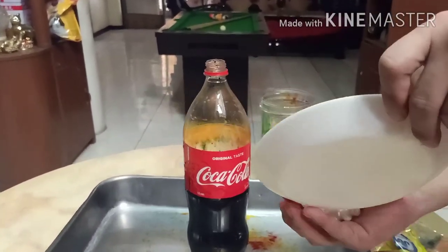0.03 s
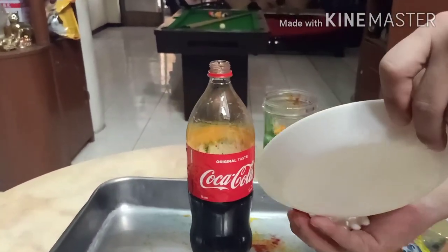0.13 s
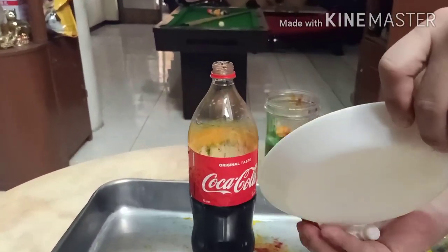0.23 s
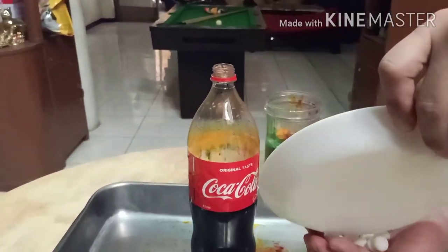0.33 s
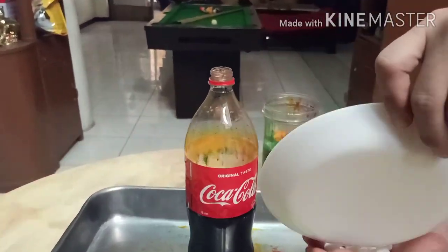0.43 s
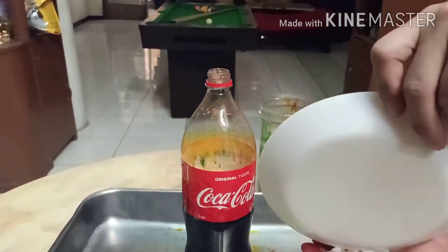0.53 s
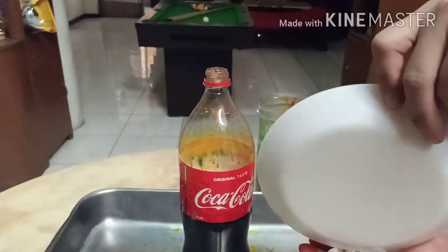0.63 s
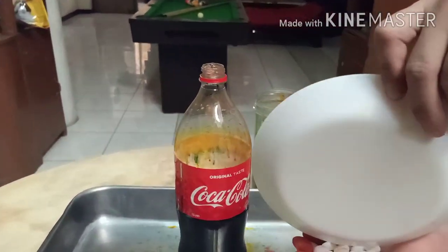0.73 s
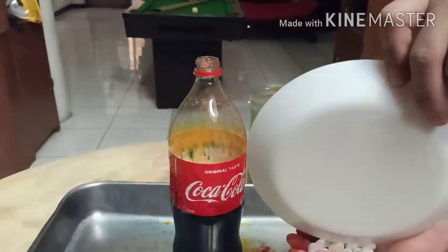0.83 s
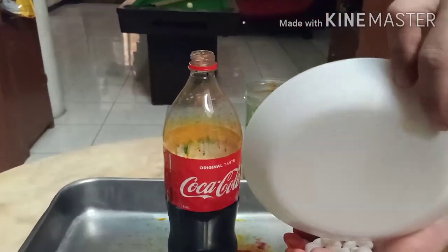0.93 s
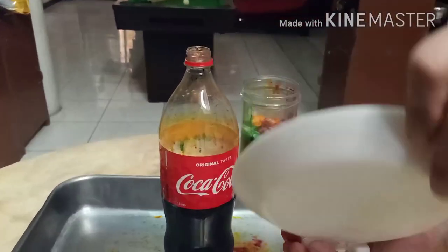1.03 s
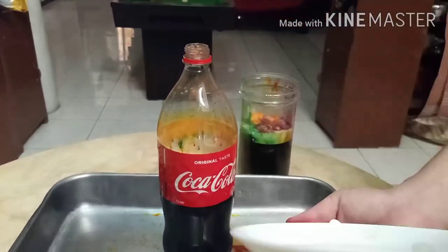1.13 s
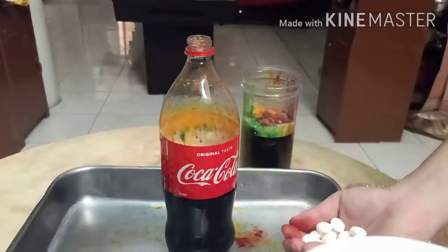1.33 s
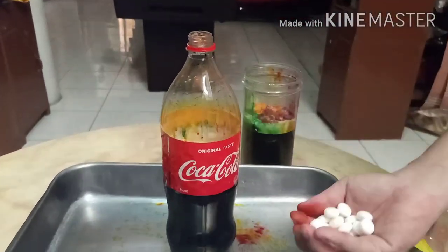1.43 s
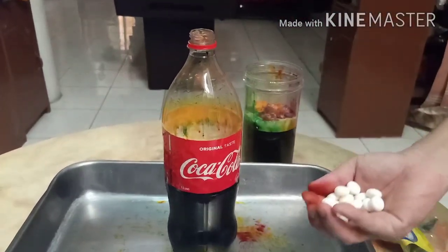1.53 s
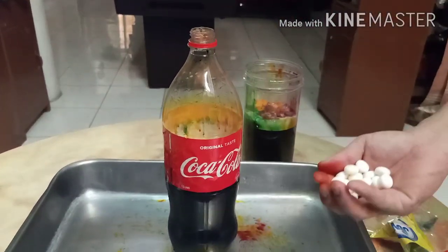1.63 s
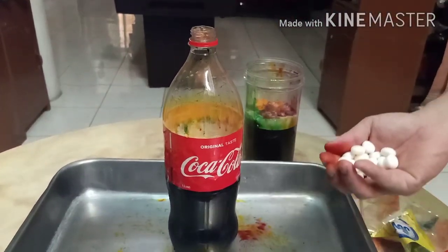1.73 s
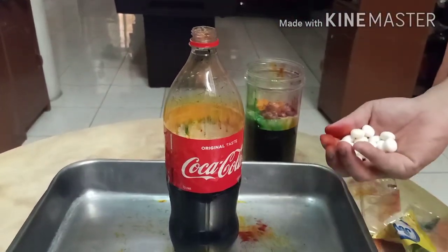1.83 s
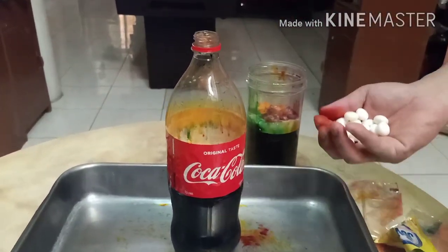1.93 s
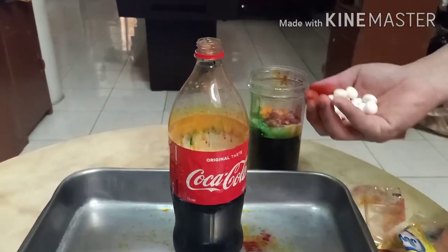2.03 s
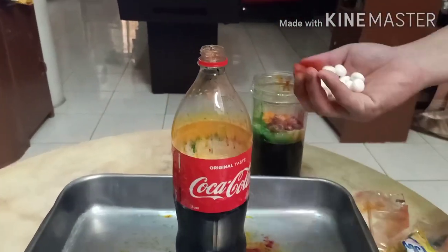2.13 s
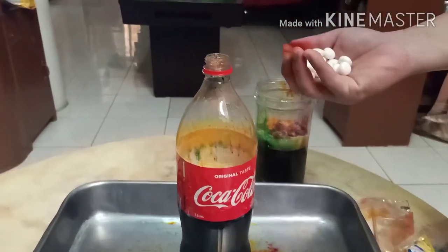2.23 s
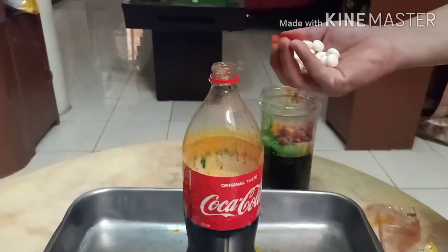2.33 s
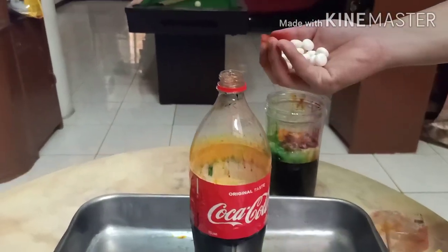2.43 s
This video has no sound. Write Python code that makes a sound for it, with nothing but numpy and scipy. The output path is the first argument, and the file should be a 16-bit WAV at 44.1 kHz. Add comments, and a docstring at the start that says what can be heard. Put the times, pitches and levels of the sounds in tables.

```python
"""Hard sweets slide off a tilted ceramic plate into a hand, clinking on the plate, which the fingers damp.
The plate is then put down on a hard table: one sharp knock, and a short clatter as it settles flat.
Each clink and knock is a set of dying sine tones plus a short noise burst; sliding is many tiny ticks.
A tiled room answers every blow with a noise tail. Hiss, a low rumble, a hum and a whine lie behind."""
import sys
import numpy as np
from scipy import signal
from scipy.fft import rfft, irfft
from scipy.io import wavfile
from scipy.ndimage import uniform_filter1d

SR = 44100
rng = np.random.default_rng(int(sys.argv[2]) if len(sys.argv) > 2 else 0)


def waveform_to_disk(signal):
    """Save audio, clipped to [-1, 1], as 16-bit WAV at the path in sys.argv[1]."""
    frames = np.transpose(np.atleast_2d(signal))
    scaled = np.clip(frames, -1, 1) * 32767
    samples = np.round(scaled).astype(np.int16)
    wavfile.write(sys.argv[1], SR, samples)


N = 108045
TIME = np.arange(N) / SR  # the whole scene [s]
RING = TIME[:SR // 2]  # the half second given to each blow [s]


def amp(db):
    """Turns decibels into a gain."""
    return 10 ** (np.asarray(db) / 20)


def unit(x):
    """Scales a signal to an rms of 1."""
    return x / np.sqrt(np.mean(x ** 2) + 1e-20)


def read(points, hz):
    """Reads a (frequency, value) table between its points, on a log-frequency axis."""
    f, value = np.transpose(points)
    return np.interp(np.log(hz + 1), np.log(f + 1), value)


def level(points):
    """Turns a (time [s], level [dB]) table into a gain over the whole scene."""
    return amp(np.interp(TIME, *np.transpose(points)))


def pan(db):
    """Gives left and right gains that differ by this many dB."""
    return amp(np.array([[db / 2], [-db / 2]]))


def add(mix, s, sound):
    """Mixes a stereo sound in at a time in seconds."""
    part = mix[:, max(round(s * SR), 0):][:, :sound.shape[1]]
    part += sound[:, :part.shape[1]]


def fall(t, t60):
    """Dies away by 60 dB in t60 seconds."""
    return np.exp(-np.log(1000) * t / t60)


def delayed(lead_ms):
    """Gives left and right clocks for a sound that reaches the left microphone first."""
    return np.maximum(RING - np.array([[0], [lead_ms / 1000]]), 0)


# how alike left and right are: (frequency [Hz], likeness [0 to 1])
LIKENESS = [(50, 0.96), (300, 0.93), (600, 0.55), (1200, 0.01)]


def coloured(x, colour):
    """Gives two noises a spectrum and makes their bass alike, as two close microphones hear it."""
    length = x.shape[1]
    hz = np.fft.rfftfreq(length, 1 / SR)
    left, other = rfft(x)
    same = np.clip(read(LIKENESS, hz), -1, 1)
    right = same * left + np.sqrt(1 - same ** 2) * other
    return unit(irfft(np.array([left, right]) * amp(read(colour, hz)), length))


def burst(colour, t60):
    """Stands in for countless dying modes with a fading noise, of energy 1 per channel."""
    rise_ms = 0.45
    shape = (1 - np.exp(-(1000 * RING / rise_ms) ** 2)) * fall(RING, t60)
    x = coloured(rng.standard_normal((2, len(RING))), colour) * shape
    return x / np.linalg.norm(x, axis=1, keepdims=True)


def mode(hz, db, t60, lead_ms):
    """Rings one struck mode: a sine that swells over its first cycle, then dies away."""
    t = delayed(lead_ms)
    swell = 1 - np.exp(-(2 * hz * t) ** 2)
    return -amp(db) * swell * fall(t, t60) * np.sin(2 * np.pi * hz * t)


# colour of the room hiss: (frequency [Hz], relative level [dB per Hz])
HISS = [(100, -2), (500, -3.5), (900, 0), (1300, -6.5), (2300, 7), (3400, -4), (4700, -9), (7000, -10.5),
        (8200, -41.5), (10000, -31.5), (16000, -38)]
HISS_DB = -58.5


def hiss():
    """Even room hiss: steady noise with a fixed colour."""
    return amp(HISS_DB) * coloured(rng.standard_normal((2, N)), HISS)


# colour of the low rumble: (frequency [Hz], relative level [dB per Hz])
RUMBLE = [(25, 5), (60, -15), (125, 4.5), (230, -6), (320, -1), (480, -16.5), (800, -21), (3000, -63.5)]
# loudness of the rumble: (time [s], level [dB])
RUMBLE_LEVEL = [(0, -45.5), (.18, -44), (.28, -47), (.38, -51.5), (.6, -46), (.95, -50.5), (1.25, -49.5),
                (1.43, -50), (1.55, -54.5), (1.8, -50), (2.45, -55)]
RUMBLE_PATCH_DB = 3  # how far patches of time and pitch stray in level, rms


def rumble():
    """A low rumble: noise that wavers in random patches of time and pitch."""
    z = signal.stft(coloured(rng.standard_normal((2, N)), RUMBLE), nperseg=1024)[2]
    patches = rng.standard_normal(z.shape[1:])
    patches = uniform_filter1d(patches, size=6, axis=0)
    patches = unit(uniform_filter1d(patches, size=3, axis=1))
    wavering = signal.istft(z * amp(RUMBLE_PATCH_DB * patches), nperseg=1024)[1][:, :N]
    return level(RUMBLE_LEVEL) * unit(wavering)


# a low hum that swells and fades: (time [s], level [dB])
HUM = [(.5, -59), (.7, -52), (.85, -47), (.97, -52.5), (1.05, -67), (2.45, -57)]
HUM_HZ, HUM_OCTAVE_DB = 75.5, -2


def hum():
    """A low tone and its octave, their pitch drifting a little."""
    drift = unit(uniform_filter1d(rng.standard_normal(N), size=4000))
    turn = 2 * np.pi * np.cumsum(HUM_HZ * (1 + 0.022 * drift)) / SR
    return level(HUM) * (np.sin(turn) + amp(HUM_OCTAVE_DB) * np.sin(2 * turn))


# a faint high whine: (time [s], level [dB])
WHINE = [(1.1, -64), (1.3, -71.5), (1.75, -67.5), (1.9, -85.5)]
WHINE_HZ, WHINE_WIDTH_HZ = 4290, 78


def whine():
    """A faint whine: noise squeezed into a narrow band."""
    band = np.exp(-((np.fft.rfftfreq(N, 1 / SR) - WHINE_HZ) / WHINE_WIDTH_HZ) ** 2)
    return level(WHINE) * unit(irfft(rfft(rng.standard_normal((2, N))) * band, N))


# how long the room rings: (frequency [Hz], time to die by 60 dB [s])
ROOM_T60 = [(100, 0.92), (400, 0.79), (1000, 0.76), (2200, 0.95), (4500, 0.69), (7000, 0.68), (14000, 0.34)]
# colour of the room: (frequency [Hz], relative level [dB])
ROOM_COLOUR = [(100, 3), (500, -2.5), (1500, 2), (3000, 3.5), (6500, -1), (9000, -3.5), (15000, -1)]
EARLY_DB, EARLY_T60 = 3.5, 0.13  # dense early reflections: level against the tail, time to die [s]


def room(x):
    """Dense early reflections, and a tail in which each band dies at its own speed."""
    noise = coloured(rng.standard_normal((2, SR)), ROOM_COLOUR)
    hz, t, z = signal.stft(noise, SR, nperseg=256)
    decay = fall(t, read(ROOM_T60, hz)[:, None]) + amp(EARLY_DB) * fall(t, EARLY_T60)
    opening = np.clip(TIME[:SR] / 0.0066 - 1, 0, 1)  # silent for 6.6 ms, full after 13.2 ms
    tail = signal.istft(z * decay, SR, nperseg=256)[1][:, :SR] * opening
    source = unit(x.mean(0))[None] * np.sqrt(np.mean(x ** 2))  # mono, but as strong as the stereo
    return signal.fftconvolve(source, tail / np.linalg.norm(tail[0]), axes=1)[:, :N]


# soft scuffs of sweets on the palm: (time [s], level [dB])
SCUFFS = [(.159, -43.5), (0.502, -49.5)]
SCUFF_HZ, SCUFF_FALL_PER_S, SCUFF_MS = 1430, 24.4, 2.6  # starting pitch, its fall, time to the peak
SWEETS_PAN_DB = 2.5  # scuffs, sliding and ticks lean left


def scuffs():
    """Sweets rub against the palm with a short blip that falls in pitch."""
    out = np.zeros((2, N))
    u = RING * 1000 / SCUFF_MS
    turn = 2 * np.pi * np.cumsum(SCUFF_HZ * np.exp(-SCUFF_FALL_PER_S * RING)) / SR
    blip = u * np.exp(1 - u) * np.sin(turn)
    for s, db in SCUFFS:
        add(out, s, pan(SWEETS_PAN_DB) * amp(db) * blip)
    return out


# sweets sliding over the glaze: (time [s], level [dB])
SLIDE = [(0, -37), (.05, -46), (.075, -46.5), (.14, -44.5), (.18, -54), (.3, -47.5), (.5, -56), (.7, -71.5)]
SLIDE_GRAINS_PER_S = 1300
# colour of a tick on the glaze, for sliding and clinks: (frequency [Hz], relative level [dB])
TICK = [(500, -30), (1100, -6), (2500, -2.5), (4500, -10), (6500, 3.5), (7800, -10.5), (9000, -24.5),
        (15000, -32)]
TICK_DB, TICK_T60 = 2.5, 0.03  # the level is added to each clink's own; time to die [s]


def slide():
    """Tiny uneven ticks at random moments as the sweets slip down the plate."""
    strength = amp(3.2 * np.minimum(rng.exponential(1, N), 4))
    grains = (rng.random(N) < SLIDE_GRAINS_PER_S / SR) * strength
    scrape = unit(signal.fftconvolve(grains[None], burst(TICK, TICK_T60), axes=1)[:, :N])
    return pan(SWEETS_PAN_DB) * level(SLIDE) * scrape


SLAP_HZ, SLAP_DB, SLAP_MS, SLAP_LEAD_MS = 1077, -5.5, 0.4, 0.19  # the level is added to each knock's own


def slap():
    """Air slapped out from under the plate: a brief burst of pressure as the gap closes."""
    t = delayed(SLAP_LEAD_MS)
    u = t * 1000 / SLAP_MS
    return -amp(SLAP_DB) * u * np.exp(1 - u) * np.sin(2 * np.pi * SLAP_HZ * t)


# plate against table: (time [s], thump level [dB], slap level [dB], ring level [dB], crack level [dB],
# left over right [dB], for all but the thump)
KNOCKS = [(1.8108, -2.5, 0.5, 2, -3, 5), (1.836, -13, -20.5, -7.5, -19.5, 6),
          (2.0646, -22, -28.5, -29.5, -53, 1.5), (2.0964, -1, -12.5, -6.5, -3.5, 2),
          (2.1037, -14, -14.5, -13.5, -24, 7), (2.1121, -8, -15, -15, -1, 4), (2.1175, 4, -25, -21, -7, -7)]
# modes of the tabletop: (frequency [Hz], level before the thump level is added [dB], time to die by 60 dB [s])
TABLE = [(77.1, -43.5, 0.46), (130.2, -49, 0.47), (200.6, -36.5, 0.2), (294, -38.5, 0.25),
         (425, -30, 0.043), (500, -30.5, 0.063), (685, -33, 0.042)]
# modes of the plate pressed on the table: (frequency [Hz], level before the ring level is added [dB],
# time to die by 60 dB [s])
PRESSED = [(946, -26.5, 0.035), (1412, -28, 0.04), (1581, -31, 0.077), (2240, -31.5, 0.062),
           (2900, -34, 0.04), (4550, -27, 0.018), (6800, -37.5, 0.046)]
# colour of each blow's dense clatter: (frequency [Hz], relative level [dB])
CLATTER = [(60, -14), (200, 0), (600, -6), (1000, -8), (1700, -2.5), (3000, -9.5), (4000, -20.5),
           (6500, -25.5), (9000, -40)]
# colour of each blow's crack: (frequency [Hz], relative level [dB])
CRACK = [(300, 5.5), (1000, 6.5), (2300, 1.5), (3600, -8), (4800, -7), (7200, -10.5), (8500, -23),
         (15000, -41)]
# levels are added to the ring and crack levels; times to die [s]
CLATTER_DB, CLATTER_T60, CRACK_DB, CRACK_T60 = 3.5, 0.052, 1, 0.01
KNOCK_LEAD_MS, KNOCK_ROOM_DB = 0.11, -9  # how much sooner the thump is heard left; level in the room
KNOCK_EDGE_HZ = 7270  # knocks lose their treble above this


def knocks():
    """The plate's foot hits the table: the top thumps, the plate slaps and rings, the contact cracks."""
    out = np.zeros((2, N))
    treble_cut = signal.butter(6, KNOCK_EDGE_HZ, fs=SR, output="sos")
    for s, thump_db, slap_db, ring_db, crack_db, side_db in KNOCKS:
        thump = sum(mode(hz, db + thump_db, t60, KNOCK_LEAD_MS) for hz, db, t60 in TABLE)
        # neighbouring modes start in opposite directions
        ring = sum((-1) ** k * mode(hz, db, t60, SLAP_LEAD_MS)
                   for k, (hz, db, t60) in enumerate(PRESSED))
        clatter = amp(CLATTER_DB) * burst(CLATTER, CLATTER_T60)
        crack = amp(CRACK_DB + crack_db) * burst(CRACK, CRACK_T60)
        plate = amp(slap_db) * slap() + amp(ring_db) * (ring + clatter) + crack
        add(out, s, signal.sosfilt(treble_cut, thump + pan(side_db) * plate))
    return out


# sweets striking the plate: (time [s], level of the modes near 3 kHz [dB], near 4.3 kHz [dB],
# near 5.2 kHz [dB], near 6.5 kHz [dB], contact tick level [dB], ring length [share of the mode's own])
CLINKS = [(0.0002, -10.5, -22, -18, -22, -39.5, 1.83), (0.0666, -14, -26, -15.5, -16, -16, 0.32),
          (0.084, -29, -8, -7, -24, -16.5, 0.33), (0.2124, -38.5, -31.5, -14, -26, -13, 0.6),
          (0.222, -7, -8, -9, -6.5, -13.5, 1.06), (0.2444, -1.5, -0.5, 2, 1.5, -1.5, 1.3),
          (0.2641, -6, -3, 0, 0, -1, 1.4), (0.2663, -1.5, -11, -12, 4.5, -8, 1.15),
          (0.2724, -29, -22, -10, -5.5, -21, 1.2), (0.3372, -9.5, -25, -7.5, -3, -12, 1.13),
          (0.4015, -2.5, -20, -5, -2, -12.5, 0.93), (0.419, -24, -14.5, -40, -35, -23, .8),
          (0.476, -18, -10, -13.5, -12.5, -12.5, 0.62), (0.483, -8.5, -10.5, -8, -13.5, -17.5, 0.88),
          (0.582, -2, -15.5, -8, -9, -7.5, 0.79), (0.607, -9.5, -20.5, -31, -26, -27, 1.7),
          (0.8972, -14, -37, -50, -56, -32, 0.16), (1.0759, -8.5, -5.5, -8, -4.5, -19, 1.42),
          (1.0901, -7.5, -7.5, -9, -10.5, -13.5, 0.92)]
# where the five levels of a clink apply, the tick's being last: frequency [Hz]
SPOT_HZ = [2900, 4400, 5200, 6500, 9000]
# modes of the hand-held plate: (frequency [Hz], level before the clink's is added [dB],
# time to die by 60 dB before the ring length share [s], left over right [dB])
PLATE = [(1654, -34.5, 0.083, -1), (2395, -39, 0.091, 1), (2846, -23.5, 0.062, 5.5),
         (3206, -36, 0.063, 12.5), (4133, -30, 0.044, 9.5), (4430, -26.5, 0.026, 9.5),
         (5252, -19, 0.026, 12.5), (5680, -26, 0.029, 3.5), (6403, -19.5, 0.041, 5),
         (6515, -12.5, 0.021, 6), (6790, -31, 0.041, -1.5), (7590, -29, 0.028, 14.5),
         (9300, -41, 0.053, -5), (10800, -51.5, 0.102, 2), (14930, -52, .03, 6)]
# from 0.6 s on, the clinks ring ever higher above 6 kHz, fully so by the last two: (time [s], pitch [share])
UPPER_PITCH = [(.6, 1), (1.05, 1.023)]
UPPER_ABOVE_HZ = 6000
LOWEST_HZ, LOWEST_DB, LOWEST_T60 = 646, -53.5, 0.28  # the lowest mode, heard only in the last clink
SPREAD_DB, SPREAD_PITCH = 1.2, .003  # random spread of each mode from clink to clink: level [dB], pitch [share]
CLINK_LEAD_MS, CLINK_ROOM_DB = 0.035, -12  # how much sooner the ringing is heard left; level in the room


def clinks():
    """Each sweet ticks on the glaze and rings the plate; the spot struck decides which modes speak."""
    out = np.zeros((2, N))
    for s, *spot_db, tick_db, ring in CLINKS:
        weights = list(zip(SPOT_HZ, spot_db + [tick_db]))  # the highest modes follow the tick
        upper_pitch = np.interp(s, *np.transpose(UPPER_PITCH))
        body = np.zeros((2, len(RING)))
        for k, (hz, db, t60, side) in enumerate(PLATE):
            pitch = 1 + SPREAD_PITCH * rng.standard_normal() + (upper_pitch - 1) * (hz > UPPER_ABOVE_HZ)
            mode_db = db + read(weights, hz) + SPREAD_DB * rng.standard_normal()
            # neighbouring modes start in opposite directions
            body += (-1) ** k * pan(side) * mode(hz * pitch, mode_db, t60 * ring, CLINK_LEAD_MS)
        tick = pan(SWEETS_PAN_DB) * amp(TICK_DB + tick_db) * burst(TICK, TICK_T60)
        add(out, s, body + tick)
    add(out, CLINKS[-1][0], mode(LOWEST_HZ, LOWEST_DB, LOWEST_T60, CLINK_LEAD_MS))
    return out


def scene():
    """Sweets on the plate, the plate on the table, and the room around them."""
    background = hiss() + rumble() + hum() + whine()
    sweets = scuffs() + slide() + clinks()
    plate = knocks()
    sweets_room = pan(1.85) * amp(CLINK_ROOM_DB) * room(sweets)
    plate_room = amp(KNOCK_ROOM_DB) * room(plate)
    return background + sweets_room + plate_room + sweets + plate


LOW_CUT_HZ, EDGE_HZ = 57, 16000


def record(dry):
    """The recorder's low cut and band limit: thins the deepest bass and removes the highest treble."""
    low_cut = signal.butter(4, LOW_CUT_HZ, "highpass", fs=SR, output="sos")
    band_limit = signal.firwin(255, EDGE_HZ, window=("kaiser", 8), fs=SR)
    return signal.oaconvolve(signal.sosfilt(low_cut, dry), band_limit[None], "same")


dry = scene()
out = record(dry)
waveform_to_disk(out)
```